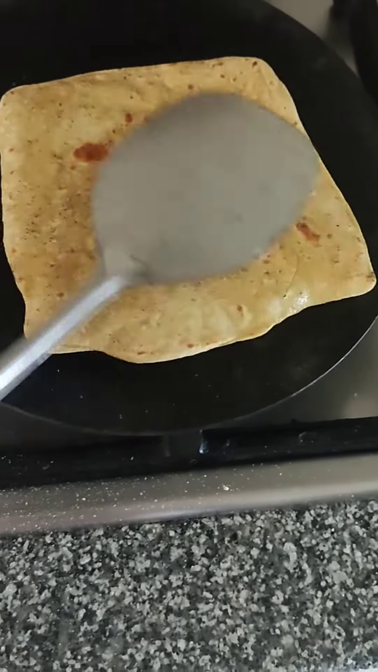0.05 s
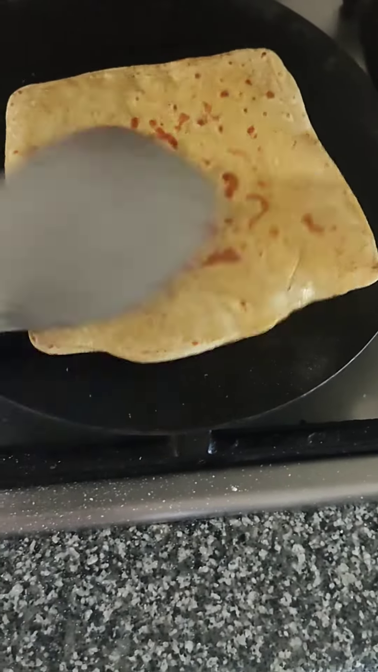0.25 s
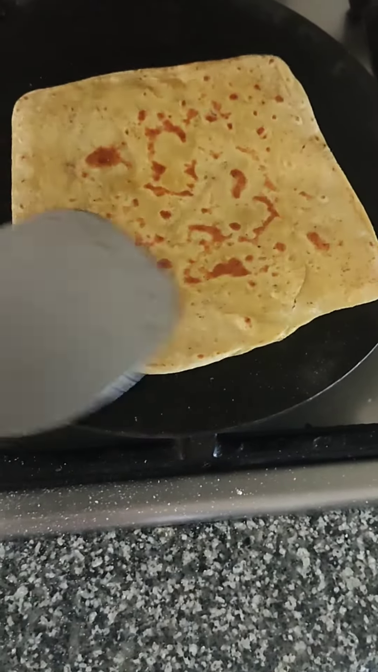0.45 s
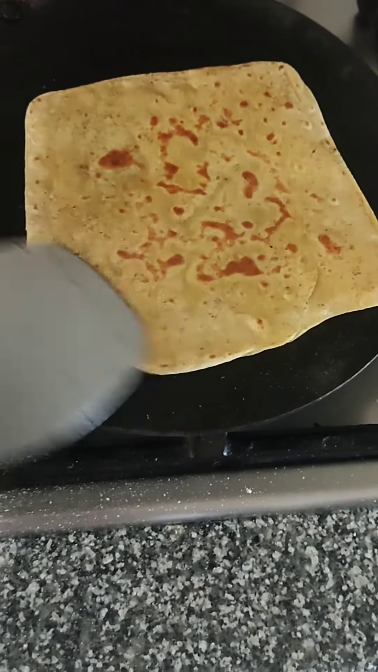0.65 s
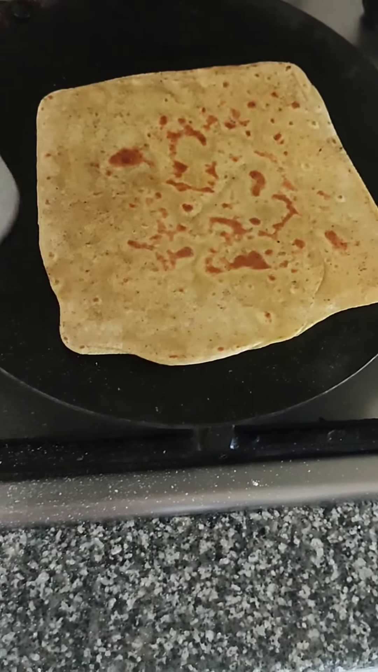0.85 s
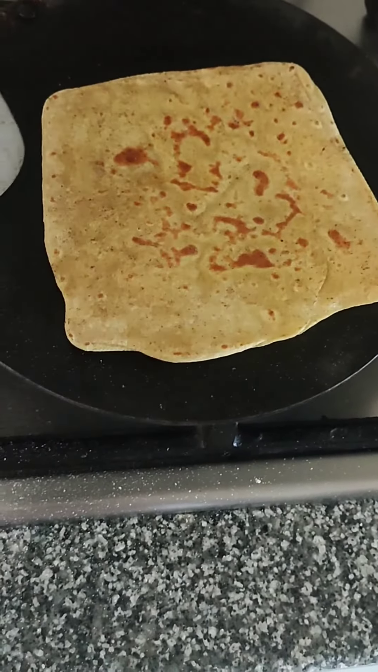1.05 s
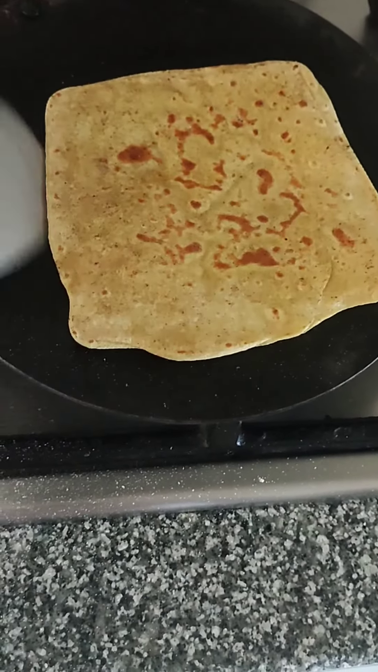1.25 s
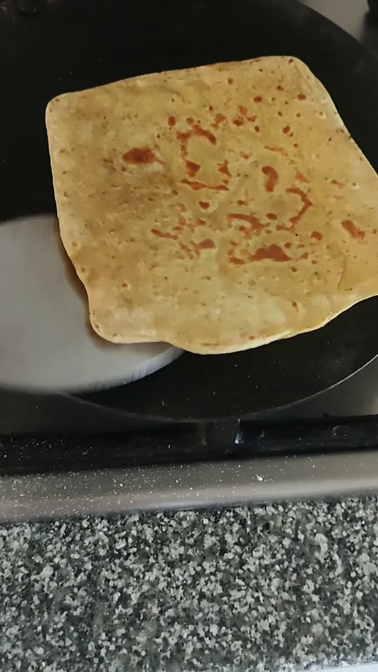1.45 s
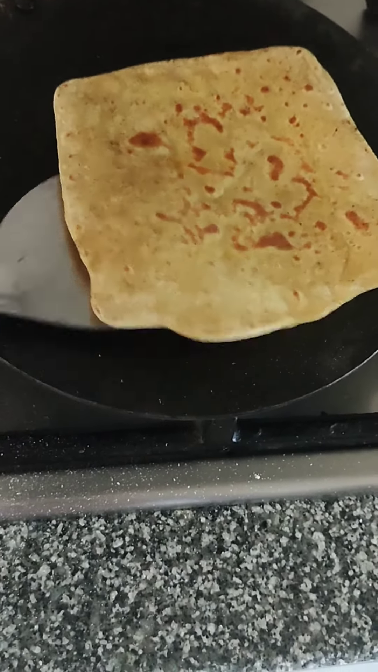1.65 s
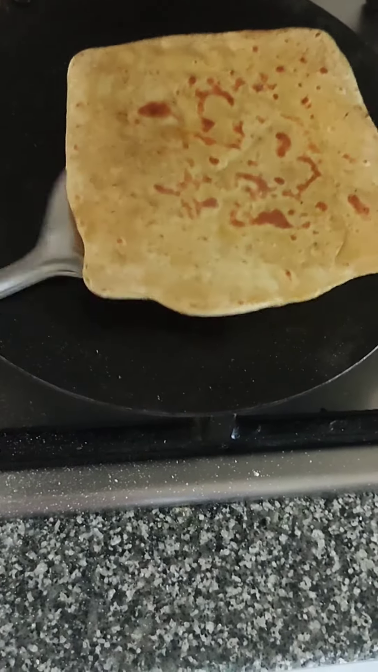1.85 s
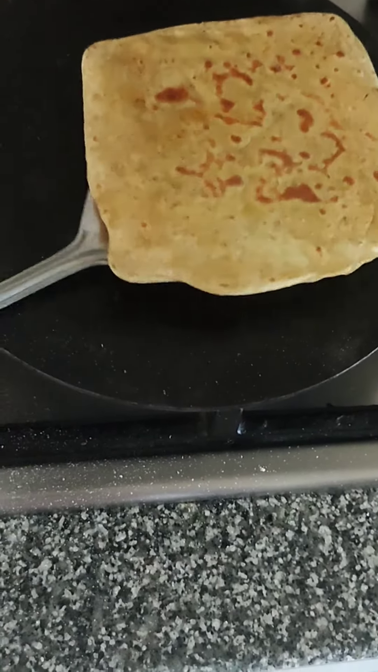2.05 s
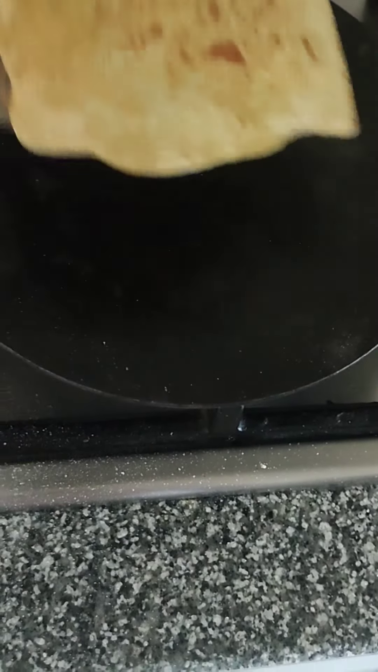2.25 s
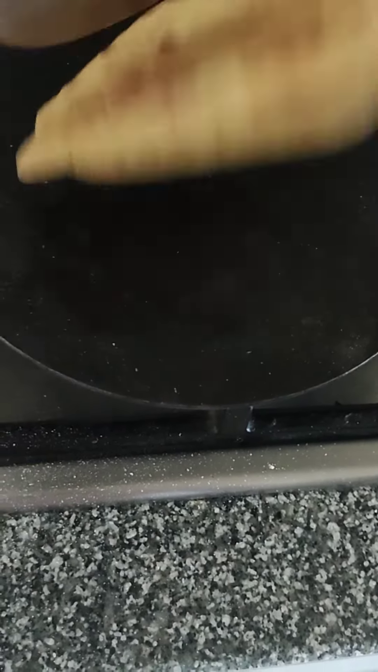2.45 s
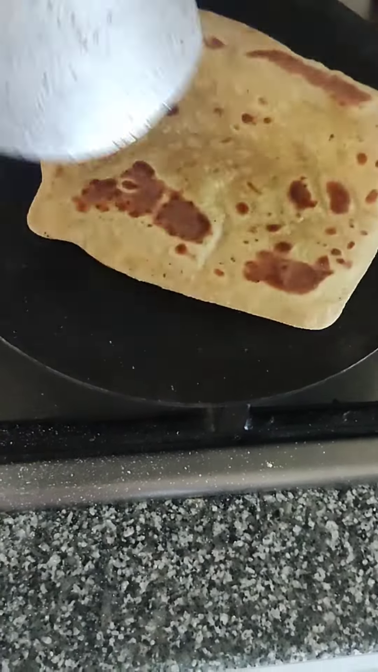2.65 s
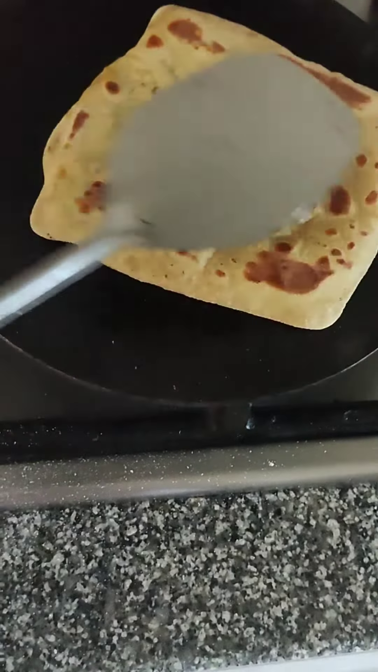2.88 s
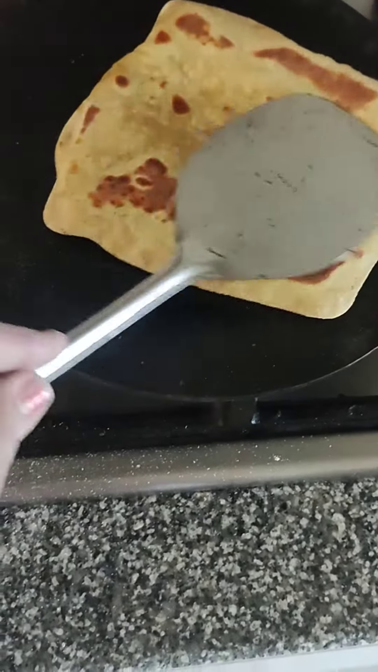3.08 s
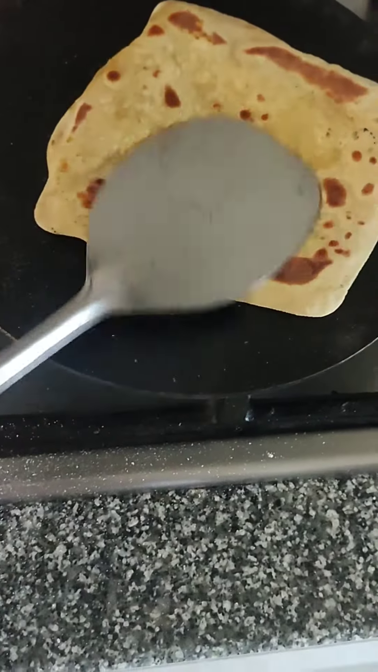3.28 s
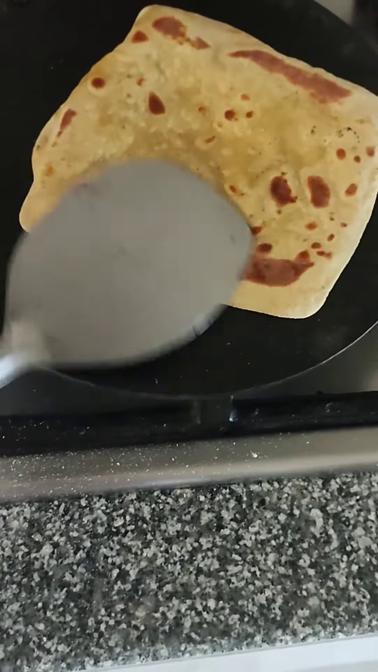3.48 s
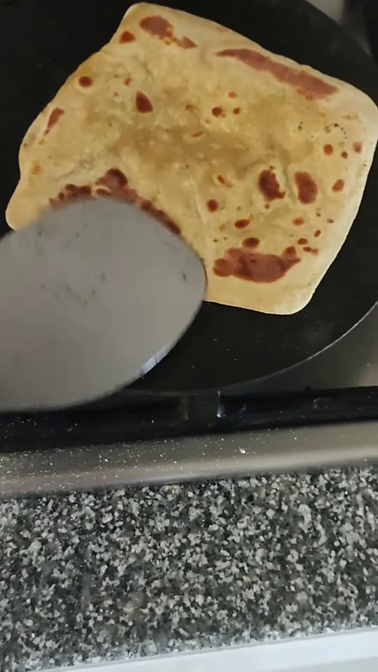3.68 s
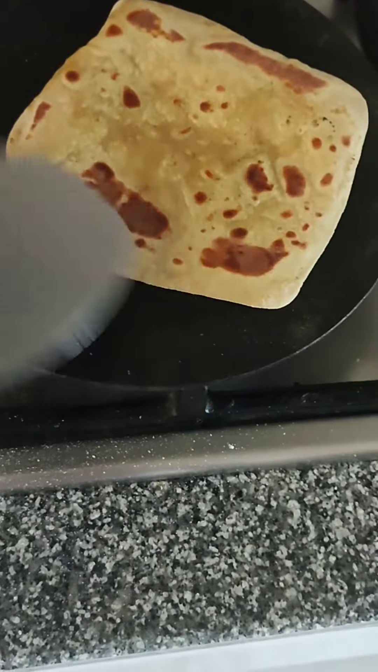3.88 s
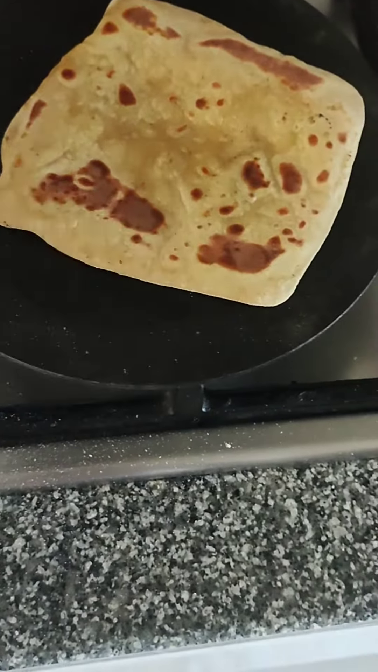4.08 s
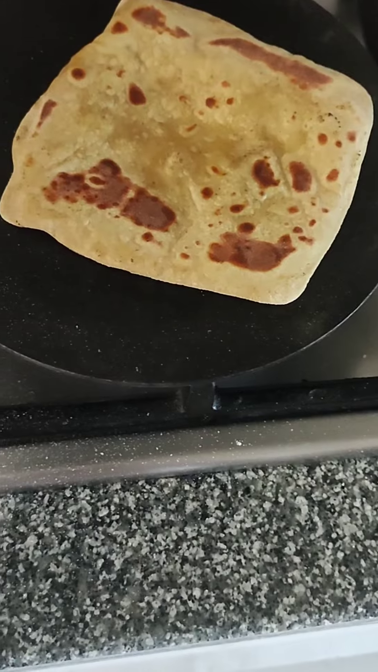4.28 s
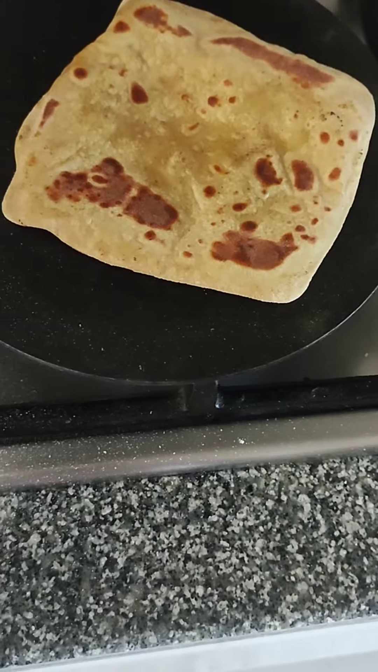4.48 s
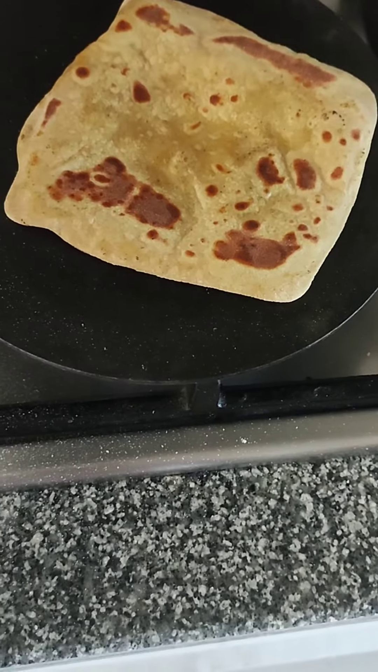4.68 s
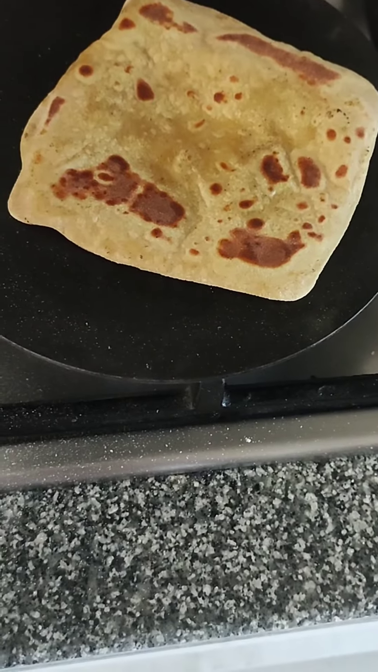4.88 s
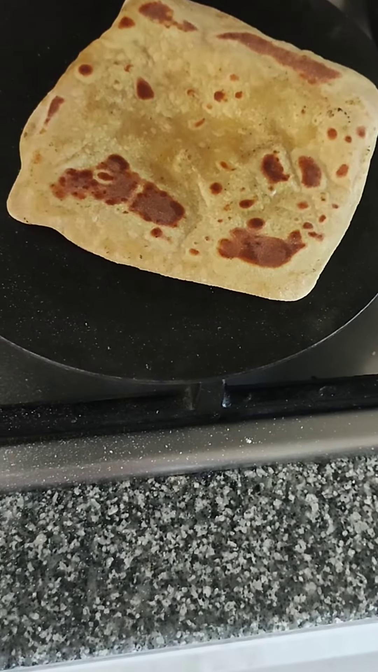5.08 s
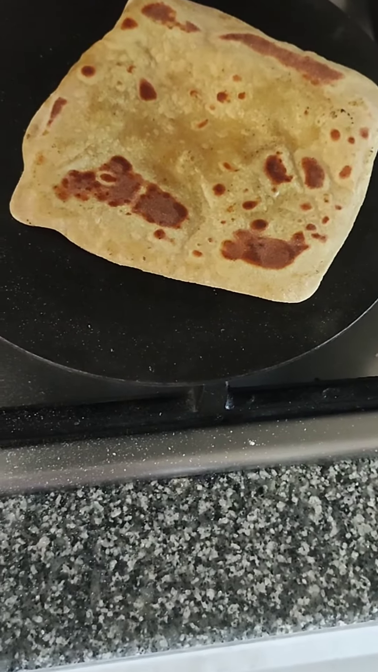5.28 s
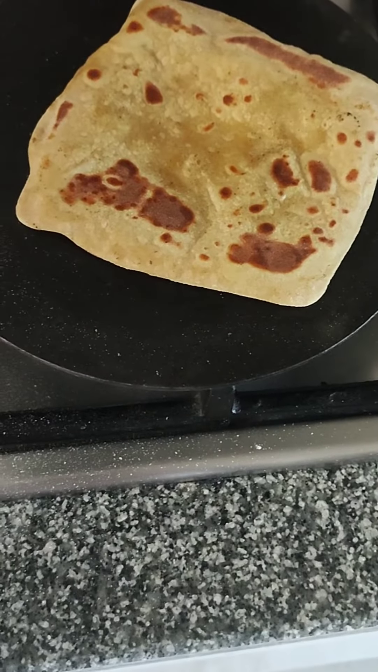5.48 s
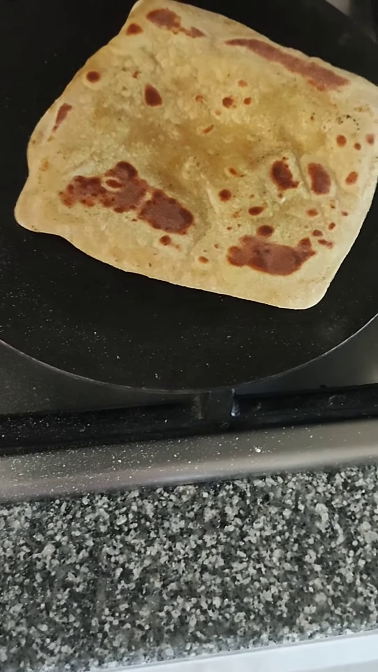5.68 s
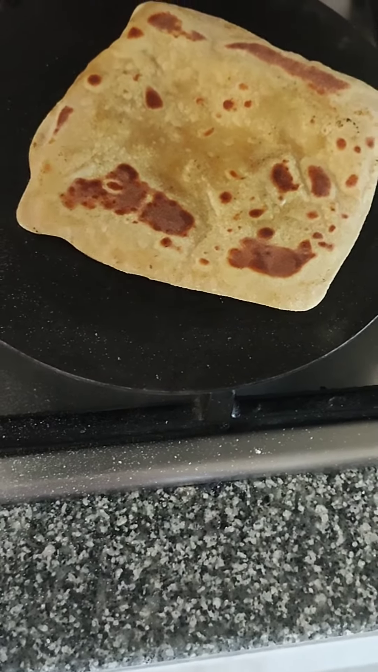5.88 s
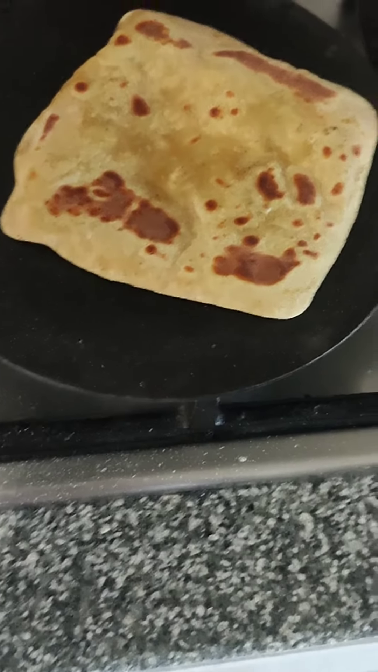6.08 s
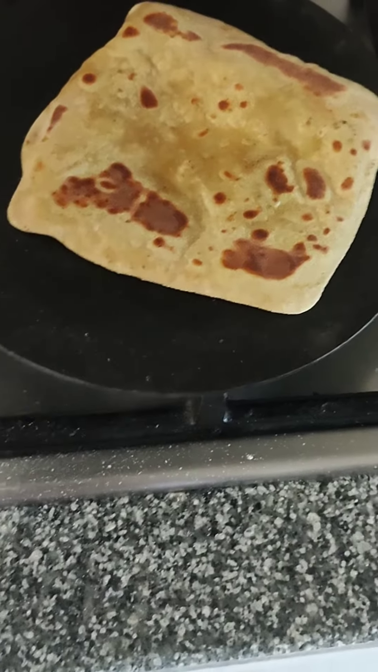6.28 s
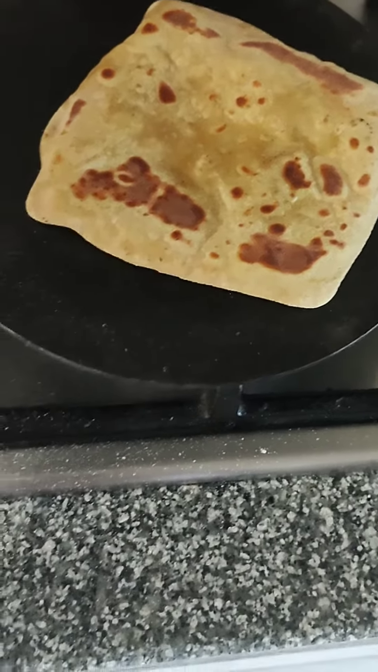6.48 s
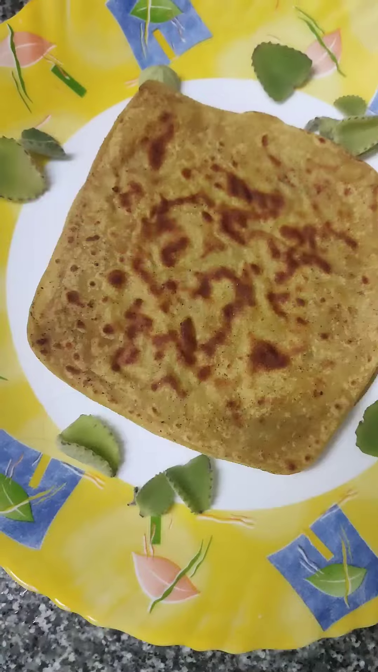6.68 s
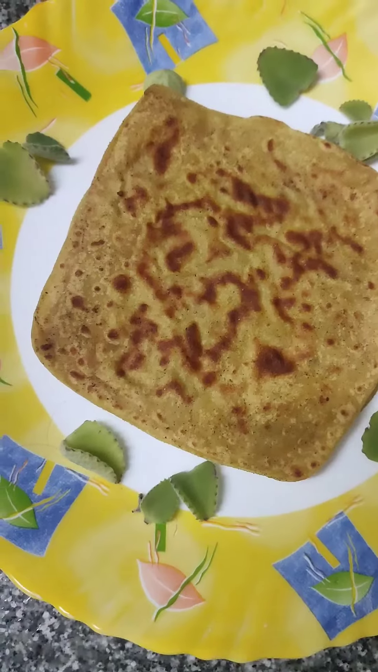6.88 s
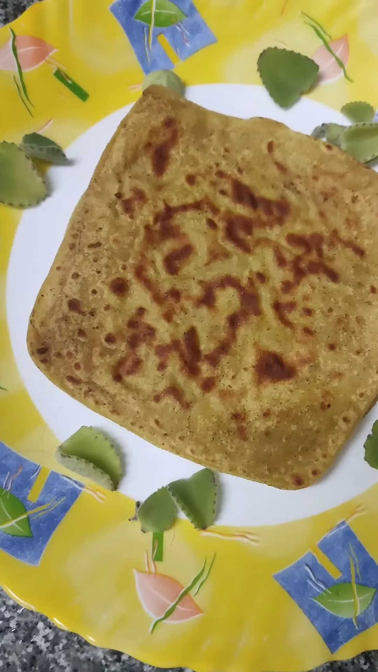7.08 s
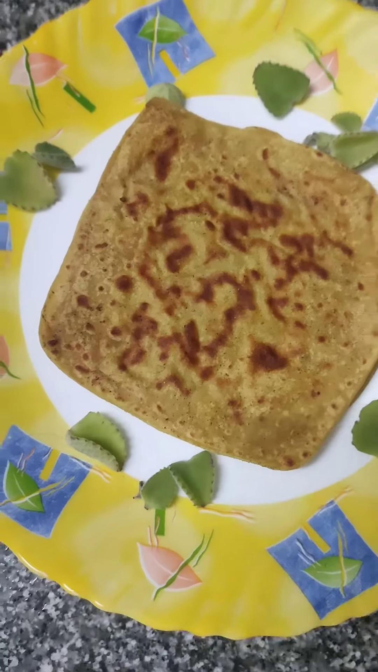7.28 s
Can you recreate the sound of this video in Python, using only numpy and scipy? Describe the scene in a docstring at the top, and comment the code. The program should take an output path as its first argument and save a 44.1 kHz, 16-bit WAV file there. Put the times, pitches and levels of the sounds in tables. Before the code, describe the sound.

A grainy rub of metal on crust opens, followed by a clink and a ringing scrape as a spatula slides under flatbread on a griddle. The turned bread slaps down, the loudest sound. Quick soft strokes, scattered bumps and another clink come over a thin hiss, heard close in a small kitchen. After a brief dropout, the microphone clicks, mostly on the right, and a faint hum remains.

```python
"""Flatbread on an iron griddle

In a small kitchen a steel spatula rubs the crust, then taps and scrapes the iron so that its blade rings.
The bread is flipped and lands with a slap of trapped air. Dull bumps and spells of hiss fill the room.
After a short silence the microphone starts afresh over a mains hum; its right side sinks, snaps back
in steps and settles."""
import sys
import numpy as np
from scipy import signal
from scipy.io import wavfile
from scipy.ndimage import uniform_filter1d

SR = 44100
rng = np.random.default_rng(int(sys.argv[2]) if len(sys.argv) > 2 else 0)


def to_wav(sig):
    """Store sig (one row per channel, or 1-D mono) as 16-bit WAV at the path in sys.argv[1].

    Samples outside -1..1 are clipped; the rate is SR.
    """
    pcm = np.clip(np.atleast_2d(sig), -1, 1) * 32767
    pcm = np.round(pcm).astype(np.int16)
    wavfile.write(sys.argv[1], SR, pcm.T)  # frames by channels


N = 323691
TIME = np.arange(N) / SR
STOP_S, START_S, SETTLE_S = 6.5555, 6.5886, 6.871  # the microphone cuts out, restarts, begins to settle
STEADY_TOP_HZ, TOP_HZ = 14350, 15250  # upper edge of the noises, and of the microphone
THUD_HZ, THUD_WIDTH_HZ = 131.5, 21.5  # the counter's low resonance


def gain_of(db):
    """Decibels to gain."""
    return 10 ** (np.asarray(db) / 20)


def unit_rms(x):
    """Scales to rms 1."""
    return x / np.sqrt(np.mean(x ** 2) + 1e-20)


def at_pitch(points, hz):
    """Reads rows of (Hz, value) along a log frequency axis."""
    pitch, value = np.transpose(points)
    return np.interp(np.log(hz + 1), np.log(pitch + 1), value)


def envelope(curves, column=1):
    """Gain over time from curves of (seconds, dB), silent outside them."""
    gain = sum(gain_of(np.interp(TIME, c[0], c[column], -200, -200)) for c in map(np.transpose, curves))
    return uniform_filter1d(gain, size=300)


def strokes(rows, rise_db_per_s=345, fall_db_per_s=325):
    """One coarse gain curve for each row of (seconds, dB, hold seconds): rise, hold, fall."""
    t = np.arange(0, N + 100, 100) / SR
    return np.array([
        gain_of(db - rise_db_per_s * np.maximum(s - t, 0) - fall_db_per_s * np.maximum(t - s - hold, 0))
        for s, db, hold, *_ in rows])


def stretch(curve):
    """Stretches a coarse curve over all samples."""
    return np.interp(np.linspace(0, 1, N), np.linspace(0, 1, len(curve)), curve)


def wander(depth_db, size, passes=1):
    """A gain that drifts at random, smoothed over size samples."""
    drift = rng.standard_normal(N)
    for _ in range(passes):
        drift = uniform_filter1d(drift, size=size)
    return gain_of(depth_db * unit_rms(drift))


def add(mix, start_s, sound):
    """Mixes a sound in at a time."""
    part = mix[..., round(start_s * SR):][..., :sound.shape[-1]]
    part += sound[..., :part.shape[-1]]


def resonate(x, hz, width_hz):
    """A resonance of peak gain 1."""
    return signal.lfilter(*signal.iirpeak(hz, hz / width_hz, SR), x)


def narrow_noise(hz, width_hz, length=N):
    """Noise passed twice through one resonance."""
    return unit_rms(resonate(resonate(rng.standard_normal(length), hz, width_hz), hz, width_hz))


def shelf(x, hz, gain):
    """Scales what lies above hz by a gain over time."""
    treble = signal.sosfiltfilt(signal.butter(3, hz, "high", fs=SR, output="sos"), x)
    return x + (gain - 1) * treble


def grit(per_s, spread_db=3.0):
    """Tiny catches of uneven size, unlike at the two sides."""
    size = gain_of(spread_db * np.minimum(rng.exponential(1, (2, N)), 5))
    return unit_rms(size * rng.standard_normal((2, N)) * (rng.random((2, N)) < per_s / SR))


# How alike the microphone's two ports hear the room. Each row: pitch in Hz, likeness from 0 to 1.
PORT_LIKENESS = [(60, 0.86), (180, 1), (500, 0.92), (1500, 0.067), (5000, 0.16), (14000, 0.24)]
# Balance between the ports. Each row: pitch in Hz, left over right in dB.
PORT_BALANCE = [(60, 1), (130, 3), (290, -4), (640, -0.5), (1400, 1.5), (3080, -1.5), (6760, -1.5),
                (14800, 1)]
# Phase between the ports. Each row: pitch in Hz, lead of the left in radians.
PORT_LEAD = [(0, -2.5), (2670, 2), (4820, -2.5), (7320, -2), (9650, -16.5), (10900, -17), (11200, -21.5),
             (13400, -1), (15000, 13)]


def noise(colour, patchy_db, size=512, t60=None, length=N):
    """Coloured noise at the two ports, with drifting patches; dies by band if t60 is given."""
    hop = size // 4
    frames, hz = length // hop + 5, np.fft.rfftfreq(size, 1 / SR)
    a, b, c, d, patches = rng.standard_normal((frames, len(hz), 5)).T
    patches = unit_rms(uniform_filter1d(uniform_filter1d(patches, size=7, axis=0), size=15, axis=1))
    hz = hz[:, None]
    likeness = np.clip(at_pitch(PORT_LIKENESS, hz), -1, 1)
    left, unrelated = a + 1j * b, c + 1j * d
    right = likeness * left * np.exp(-1j * at_pitch(PORT_LEAD, hz))
    right += np.sqrt(1 - likeness ** 2) * unrelated
    balance = gain_of(at_pitch(PORT_BALANCE, hz) / 2)
    spectra = np.array([left * balance, right / balance])
    spectra *= gain_of(at_pitch(colour, hz) + patchy_db * patches) * (hz < STEADY_TOP_HZ)
    if t60:
        spectra *= gain_of(-60 * np.arange(frames) * hop / SR / at_pitch(t60, hz))
    return unit_rms(signal.istft(spectra, nperseg=size, noverlap=size - hop)[1][:, :length])


# Air all round the microphone. Each row: pitch in Hz, relative density in dB.
AIR_COLOUR = [(29, -35), (50, 1), (145, -14.5), (202, -13.5), (533, -14.5), (692, -26), (897, -16),
              (1140, -24.5), (3070, -30.5), (7370, -36.5), (10800, -49), (13300, -41), (14300, -41)]
# The air swells while the pan is worked. Each row: time in seconds, level in dB, hold in seconds.
AIR_SWELLS = [(0.29, -69, .02), (1.53, -53, 0.13), (2.65, -57.5, 0.029)]
# Rumble at the bottom of the room. Each row: pitch in Hz, relative density in dB.
RUMBLE_COLOUR = [(3, -0.5), (12, 5), (30, -7.5), (60, -15.5), (90, -56)]
# Its rise and fall. Each row: time in seconds, level in dB.
RUMBLE_LEVELS = [(0, -64), (.7, -51), (1.7, -65), (2.2, -48.5), (3.1, -49), (3.7, -54), (4.13, -51.5),
                 (5.1, -53.5), (5.5, -54), (5.9, -57), (6.56, -54.5)]


def room_tone():
    """Swelling kitchen air, a drone at the counter's pitch and a deep rumble."""
    swells = stretch(strokes(AIR_SWELLS, rise_db_per_s=68, fall_db_per_s=51).sum(0))
    air = noise(AIR_COLOUR, 2.5, size=1024) * (gain_of(-61) + swells)
    drone = narrow_noise(THUD_HZ, width_hz=35) * gain_of(-63) * wander(1.5, size=8000, passes=2)
    rumble = noise(RUMBLE_COLOUR, 0, size=4096) * envelope([RUMBLE_LEVELS])
    return air + drone + rumble * wander(1.5, size=8000, passes=2)


# A thin hiss in the kitchen. Each row: pitch in Hz, relative density in dB.
HISS_COLOUR = [(1470, -20), (2500, -9), (4170, -27), (4290, -10), (4610, -6.5), (5340, -9), (5460, -2.5),
               (6090, 3), (7250, 2.5), (8830, -4.5), (9780, -3), (10600, -7.5), (12600, -1), (14300, -5)]
# Its spells. Each row: start and end in seconds, level in dB, treble lift in dB.
HISS_SPELLS = [(0, 2.2, -65.5, -5), (2.2, 3.1, -65.5, -11), (3.9, 5.9, -63.5, -5), (5.32, 6.035, -59, 0.5),
               (6.189, 6.86, -59.5, 3.5)]


def hiss(burst_db=3.5, ease_s=0.083):
    """Finely sputtering hiss; each spell opens louder and eases."""
    level_db, treble_db = np.full(N, -71.5), np.full(N, 5)  # faint and bright between spells
    for start, end, db, lift_db in HISS_SPELLS:
        on = (TIME >= start) & (TIME < end)
        level_db = np.where(on, db + burst_db * np.exp(-abs(TIME - start) / ease_s), level_db)
        treble_db = np.where(on, lift_db, treble_db)
    sputter = noise(HISS_COLOUR, 1.9) * (1 + .2 * uniform_filter1d(abs(grit(1500)[0]), size=30))
    treble = gain_of(uniform_filter1d(treble_db, size=900))
    return shelf(sputter, 8100, treble) * gain_of(uniform_filter1d(level_db, size=900))


# Mains hum behind the restart. Each row: pitch in Hz, rms level in dB.
HUM_PARTIALS = [(102.3, -55.5), (306.8, -72.5), (452.2, -75.5), (899.0, -79), (1841, -84)]
# Air at the restarted microphone. Each row: pitch in Hz, relative density in dB.
RESTART_AIR_COLOUR = [(18, -49), (30, -8), (41, -23.5), (55, -16), (107, -22.5), (176, -35.5), (364, -36.5),
                      (497, -37.5), (1870, -50), (5440, -63), (6880, -59.5), (13200, -65), (15000, -80)]
# That air fading in. Each row: time in seconds, level in dB.
RESTART_AIR_LEVELS = [(6.59, -63), (6.86, -51.5), (7.34, -52.5)]


def hum_and_air():
    """A wavering mains hum and room air fade in as the microphone restarts."""
    hum = sum(np.sqrt(2) * gain_of(db) * np.sin(2 * np.pi * hz * TIME) for hz, db in HUM_PARTIALS)
    hum *= wander(2.5, size=1500) * np.clip((TIME - START_S) / 0.3, 0, 1)
    return hum + noise(RESTART_AIR_COLOUR, 2.4, size=1024) * envelope([RESTART_AIR_LEVELS])


# Jumps on the microphone's right side. Each row: time in seconds, step as a share of full scale.
RIGHT_SNAPS = [(6.5886, -.06), (6.6676, .17), (6.7311, .145), (6.7896, .066), (6.79, .065), (6.8506, .068)]
# Soft pops on its left. Each row: centre in seconds, height as a share of full scale, length in ms.
LEFT_POPS = [(6.7498, -.026, 5), (6.7636, .028, 5), (6.8149, .03, 5), (6.8336, .033, 5), (7.03, .013, 60),
             (7.062, -.012, 30), (7.206, -.009, 20)]


def microphone_settling(sink_per_s=4.95, slowing_per_s2=5.85, tremble_hz=148):
    """The right side sinks ever more slowly, trembles, snaps and drains to zero; the left pops."""
    out = np.zeros((2, N))
    elapsed = np.clip(TIME, START_S, SETTLE_S) - START_S
    band = signal.butter(2, [tremble_hz / 8, tremble_hz], "band", fs=SR, output="sos")
    tremble = gain_of(-37) * unit_rms(signal.sosfilt(band, rng.standard_normal(N)))
    out[1] += tremble * elapsed / elapsed[-1] * np.clip((SETTLE_S - TIME) * 100, 0, 1)
    sag = slowing_per_s2 * elapsed ** 2 - sink_per_s * elapsed
    snaps = sum(step * (TIME >= s) for s, step in RIGHT_SNAPS)
    out[1] += (sag + snaps) * np.exp(-np.maximum(TIME - SETTLE_S, 0) / 0.2)
    for s, height, ms in LEFT_POPS:
        add(out[0], s - ms / 2000, height * np.hanning(int(ms * SR / 1000)))
    return out


# The small kitchen's echo. Each row: pitch in Hz, seconds to fall 60 dB.
KITCHEN_DECAY = [(100, 0.062), (500, 0.34), (2000, 0.52), (6000, 0.22), (14000, 0.054)]


def kitchen_echo(x):
    """Nearby walls return a short tail that lasts longest in the mids."""
    tail = noise([(100, 0.38), (15000, -2.4)], 0, size=256, t60=KITCHEN_DECAY, length=SR // 2)
    tail[:, :90] = 0  # the first echo arrives after 2 ms
    return signal.fftconvolve(x.mean(0)[None], tail / np.linalg.norm(tail[0]), axes=1)[:, :N]


# Dull bumps near the middle of the stereo picture.
# Each row: start in seconds, level in dB, relative width of the pushes, thud share in dB.
DULL_BUMPS = [(0.247, -38.5, 1.5, 0), (0.35, -33.5, 1.3, -32), (0.978, -38.5, 1.13, 3.5),
              (1.238, -38, 1.1, -2.5), (1.648, -38.5, 0.74, 0.5), (1.789, -44, 0.8, 4),
              (1.817, -37, 1.2, -2.5), (2.385, -39.5, 0.73, -14), (2.475, -41, 0.86, 5.5),
              (2.548, -33, 0.48, -6), (2.895, -43.5, 0.93, -4), (3.105, -42, 2.2, -2),
              (3.161, -41.5, 0.79, 4), (3.194, -38, 2.2, -14), (3.323, -44.5, 1.3, -2.5),
              (3.676, -44.5, 1.4, -1), (4.018, -42.5, 1.1, -2), (4.22, -43, 1.04, -5),
              (4.26, -38, 0.63, -2.5), (4.325, -41.5, 1.6, -13), (4.43, -43, 1.3, -3.5),
              (4.626, -41, 1.3, -5.5), (4.847, -41.5, 1.2, -14), (5.091, -45.5, 0.62, -1),
              (5.279, -37.5, 1.1, -3), (5.46, -41.5, 0.78, -7), (5.689, -37, 1.1, -2),
              (5.982, -42, 0.91, -5), (6.187, -44.5, 0.97, -3), (6.206, -37.5, 1.07, -0.5),
              (6.548, -42, 0.82, 2)]


def bumps(crunch_db=-15, crunch_t60=0.047):
    """Each bump is four quick inward pushes that soften, with a click, a rough crunch and a low thud."""
    out, t = np.zeros((2, N)), np.arange(3000) / SR
    fade = 0.75 ** np.arange(4)[:, None]
    low_cut = signal.butter(1, 160, "high", fs=SR)
    crunch_band = signal.butter(2, [150, 1220], "band", fs=SR)
    for (s, db, width, thud_db), (*gaps, side) in zip(DULL_BUMPS, rng.random((len(DULL_BUMPS), 5))):
        push_s = 0.00294 + 0.002876 * np.cumsum(gaps)[:, None]
        width_s = 0.00035 * width / np.sqrt(fade)
        pushes = -(fade * np.exp(-((t - push_s) / width_s) ** 2)).sum(0)
        pushes = 1.48 * signal.lfilter(*low_cut, pushes)
        click = -5.0 * np.exp(-((t - push_s[0]) / .00012) ** 2)
        click *= gain_of(-15 + 0.87 * thud_db)  # heavier thuds click harder
        age = np.maximum(t - push_s[0], 0)
        crunch = unit_rms(signal.lfilter(*crunch_band, rng.standard_normal((2, len(t)))))
        crunch *= gain_of(crunch_db - 60 * age / crunch_t60) * (age > 0)
        thud = -gain_of(thud_db) * np.sin(2 * np.pi * THUD_HZ * age) * np.exp(-np.pi * THUD_WIDTH_HZ * age)
        sides_db = np.array([[1.25], [-1.25]]) * (2 * side - 1)
        add(out, s, gain_of(db + sides_db) * (pushes + crunch + click + thud))
    return out


# Steel on crust, heard dry. Each row: pitch in Hz, relative density in dB.
CRUST_COLOUR = [(180, -61), (300, -8), (422, -16), (645, -12), (837, -3.5), (1320, -3.5), (1770, -4.5),
                (2260, -3), (2840, -9.5), (5720, -8), (7180, -4), (9320, -12.5), (13100, -12), (14700, -18)]
# Strokes over the bread.
# Each row: time of full pressure in seconds, level in dB, hold in seconds, treble lift in dB.
CRUST_STROKES = [(0.013, -64, 0.85, 2), (0.077, -56.5, 0.46, -3), (0.126, -47, 0.027, -8),
                 (0.262, -38, 0.051, -6.5), (0.402, -49, 0.041, -2.5), (0.624, -55, 0.0072, 1),
                 (0.735, -55, 0.017, 4), (0.968, -54.5, .02, 0), (1.037, -65, 0.23, -4),
                 (3.017, -63.5, 0.079, 2.5), (3.044, -48, 0.012, -6.5), (3.148, -58.5, 0.033, 0),
                 (3.254, -64, 0.54, -0.5), (3.264, -44.5, 0.015, -2.5), (3.358, -49.5, 0.033, 1.5),
                 (3.465, -46, 0.017, 0), (3.569, -45, .01, -4), (3.66, -46, 0.0072, -4),
                 (3.745, -49, 0.0081, -8), (3.848, -52.5, 0.016, -3.5)]


def crust_rubs():
    """Crumbs break under the blade: a grainy wide hiss, brighter where the blade skims lightly."""
    crumbs = 1 + 0.49 * uniform_filter1d(abs(grit(3000)[0]), size=20)
    gains = strokes(CRUST_STROKES)
    pressure = gains.sum(0)
    treble = gain_of(np.transpose(CRUST_STROKES)[3]) @ gains / pressure
    grains = unit_rms(noise(CRUST_COLOUR, 1.9) * crumbs)
    return shelf(grains, 3800, stretch(treble)) * stretch(pressure)


# Modes of the steel blade.
# Each row: pitch in Hz, seconds to fall 60 dB, relative level in dB when rubbed and when struck.
BLADE_MODES = [(275, 0.26, 0, -23), (434.4, 0.17, 12.5, -8.5), (740, 0.11, -28, -34), (1060, 0.054, -3, -4),
               (1167, 0.26, -6.5, -9), (1700, 0.02, -16, -32), (1900, 0.044, 4.5, -14),
               (2030, 0.27, -1.5, -15.5), (2247, 0.039, 1, -6.5), (2622, 0.055, 4.5, -1),
               (2766, 0.036, 1.5, -21), (3035, 0.082, 3.5, -10), (3550, 0.062, -7, -16),
               (3890, 0.063, -2, -17), (5010, 0.11, -5, -21), (6316, 0.04, 0, -11.5), (7460, 0.11, -5, -11),
               (7850, 0.23, -4, -24), (8800, 0.022, -4, -34), (10340, 0.022, -1, -67),
               (12200, 0.022, -5, -18)]
# Two slides of the edge across the iron, a list for each.
# Each row: time in seconds, relative ring level in dB, fizz level in dB, favoured pitch in Hz.
IRON_SLIDES = [
    [(1.19, -74, -77, 2350), (1.225, -61.5, -62, 2740), (1.3, -43.5, -49, 2310), (1.44, -43, -48.5, 2720),
     (1.6, -52.5, -54.5, 2130), (1.686, -57.5, -54, 2200), (1.7, -45.5, -49, 2560),
     (1.76, -52, -52.5, 2680), (1.83, -53, -54, 2520), (1.845, -47.5, -50.5, 2290),
     (1.95, -57, -53.5, 2530), (2.18, -74, -61.5, 2000)],
    [(4.88, -76, -79, 2100), (4.928, -64, -60.5, 2180), (5.066, -68.5, -60, 2170), (5.12, -75, -85, 2110)],
]
# The edge bites and the low modes groan. Each row: time in seconds, relative level in dB, hold in seconds.
EDGE_BITES = [(1.234, -57, 0.087), (1.45, -49, 0.024), (1.686, -59, 0.014), (1.844, -61, .01),
              (1.98, -65.5, 0.039)]


def iron_scrapes():
    """Grit drives the blade's modes in uneven slips; as the grip shifts, those near one pitch stand out."""
    rows = np.concatenate(IRON_SLIDES)
    favoured_hz = np.interp(TIME, rows[:, 0], rows[:, 3])
    ringing, groaning = envelope(IRON_SLIDES), stretch(strokes(EDGE_BITES).sum(0))
    grips = unit_rms(uniform_filter1d(rng.standard_normal((len(BLADE_MODES), N // 441 + 2)), size=9))
    slips = wander(1.6, size=200)
    drive = signal.sosfilt(signal.butter(12, STEADY_TOP_HZ, fs=SR, output="sos"), grit(5000))
    drive[1] += 0.49 * np.roll(drive[0], 6)  # the right port hears some of the left, just after
    ring = 0
    for (hz, t60, db, _), grip in zip(BLADE_MODES, grips):
        grip_db = 3.0 * np.interp(TIME * 100, np.arange(len(grip)), grip)
        favour_db = 4.5 * np.exp(-(np.log2(hz / favoured_hz) / 0.15) ** 2)
        contact = groaning if hz < 500 else ringing * gain_of(favour_db)
        width_hz = (2.6 + (hz / 3500) ** 2) / t60  # contact damps the ring, most in the treble
        ring += gain_of(db + grip_db) * contact * unit_rms(resonate(drive * slips, hz, width_hz))
    fizz = slips * noise(CRUST_COLOUR, 4.8) * envelope(IRON_SLIDES, column=2)
    return 0.31 * ring + fizz


# The blade strikes the griddle. Each row: start in seconds, level in dB, ring share in dB, seconds for
# the rattle to fall 60 dB, favoured pitch in Hz, share of the free ring time, shudder share in dB.
BLADE_TAPS = [(0.9215, -33.5, 2.5, 0.11, 2020, 0.81, -24.5), (1.697, -47.5, 6, 0.04, 2600, 0.74, -9),
              (2.041, -42.5, -14, 0.037, 9000, .4, -29), (2.279, -40, 15.5, 0.0047, 2090, 0.062, -30),
              (2.998, -53, -5, .05, 1900, .3, -32), (3.0426, -47, 12, .04, 2500, 0.62, -21),
              (4.663, -53, 13.5, 0.45, 2100, 0.46, -6.5), (5.3158, -38.5, 1, 0.16, 1080, 0.95, -16.5)]


def blade_taps(tilt_db_per_octave=4.5, shudder_peak_s=0.033):
    """The blade rattles and rings, most near a pitch set by where it lands; the pan shudders."""
    out, t = np.zeros((2, N)), np.arange(SR // 4) / SR
    for s, db, ring_db, rattle_t60, favoured_hz, ring_share, shudder_db in BLADE_TAPS:
        shudder = gain_of(shudder_db) * narrow_noise(hz=252, width_hz=80, length=len(t))
        shudder *= t / shudder_peak_s * np.exp(1 - t / shudder_peak_s)
        rattle = noise(CRUST_COLOUR, 0.96, size=256, length=len(t)) * gain_of(-60 * t / rattle_t60)
        ring = 0
        for (hz, t60, _, struck_db), phase in zip(BLADE_MODES, rng.random((len(BLADE_MODES), 2, 1))):
            mode_db = ring_db + struck_db - tilt_db_per_octave * abs(np.log2(hz / favoured_hz))
            ring += gain_of(mode_db - 60 * t / (t60 * ring_share)) * np.sin(2 * np.pi * (hz * t + phase))
        attack = np.minimum(t / 0.0021, 1)
        add(out, s, gain_of(db) * (0.7 * rattle + ring + shudder) * attack)
    return out


# Hiss of the bread's edge touching down. Each row: pitch in Hz, relative density in dB.
BREAD_EDGE_COLOUR = [(880, -51), (1500, -21.5), (5930, -4.5), (7560, 10), (10600, -16), (11900, -9),
                     (14000, -4)]
# The slap washing through the kitchen. Each row: pitch in Hz, relative density in dB.
WASH_COLOUR = [(24, -30), (40, -3), (169, -68), (221, -23), (270, -20), (355, -7), (490, 0), (1140, -9.5),
               (2220, -11), (3300, -21.5), (7680, -22), (12600, -31.5), (15000, -59.5)]
# The wash dying away. Each row: pitch in Hz, seconds to fall 60 dB.
WASH_DECAY = [(100, 0.12), (500, 0.53), (2000, 0.41), (5000, 0.4), (9000, 0.26), (14000, 0.2)]
# Modes of the iron plate. Each row: pitch in Hz, level in dB, seconds to fall 60 dB.
GRIDDLE_MODES = [(68, -30, 0.58), (124, -27.5, 0.21), (169.7, -22.5, 0.16), (280.4, -31, 0.37),
                 (435, -15, 0.098), (504, -23, 0.14), (720, -47, .4), (844, -26, 0.18)]


def bread_slap(edge_s=2.5605, flat_s=2.5663):
    """The bread lands edge first, then squeezes out air in one pressure pulse; iron and kitchen answer."""
    out, t = np.zeros((2, N)), np.arange(SR) / SR
    pulse_time = t[:200] / .00022
    pulse = gain_of(-1) * pulse_time * (1 - pulse_time / 2.8) * np.exp(1 - pulse_time)
    add(out[0], flat_s, pulse)
    add(out[1], flat_s + .0003, .75 * pulse)  # later and softer at the right port
    add(out, edge_s, gain_of(-23.5) * noise(BREAD_EDGE_COLOUR, 0, size=256, length=300) * np.hanning(300))
    wash = noise(WASH_COLOUR, 0.38, size=256, t60=WASH_DECAY, length=SR)
    onset = np.minimum(t / 0.002, 1) * (1 + 2.8 * np.exp(-t / 0.0097))
    add(out, flat_s, gain_of(-42.5) * wash * onset)
    port_delay_s = np.array([[0], [.0006]])  # the sides hear the plate out of step
    for hz, db, t60 in GRIDDLE_MODES:
        mode = np.sin(2 * np.pi * hz * (t - port_delay_s))
        attack = 1 - np.exp(-t * hz / 4.4)
        add(out, flat_s, gain_of(db - 60 * t / t60) * mode * attack)
    return out


def scene():
    """The cooking as the microphone hears it, a short silence, then the restart."""
    tapped, bumped = blade_taps(), bumps()
    echoes = kitchen_echo(gain_of(-8) * tapped + gain_of(-7.5) * bumped)
    cooking = tapped + bumped + echoes + crust_rubs() + iron_scrapes() + bread_slap()
    kitchen = cooking + hiss() + room_tone()
    cut_out = np.clip((STOP_S - TIME) * 1000, 0, 1)
    restart = hum_and_air() + microphone_settling()
    return kitchen * cut_out + restart * (TIME >= START_S)


def record(dry):
    """The microphone's band ends steeply in the high treble."""
    low_pass = signal.firwin(511, TOP_HZ, window=("kaiser", 9), fs=SR)
    return signal.oaconvolve(dry, low_pass[None], "same")


dry = scene()
out = record(dry)
to_wav(out)
```